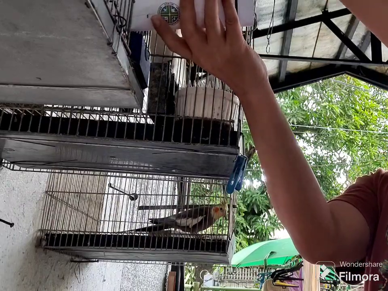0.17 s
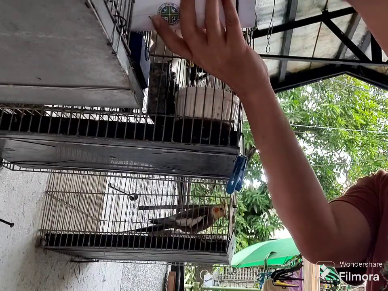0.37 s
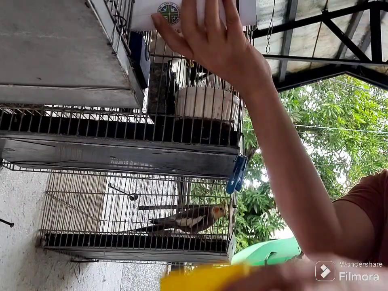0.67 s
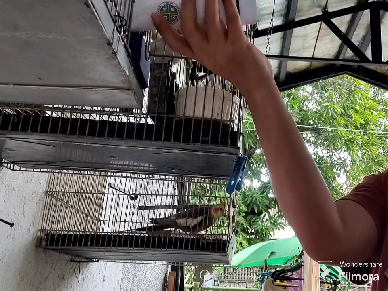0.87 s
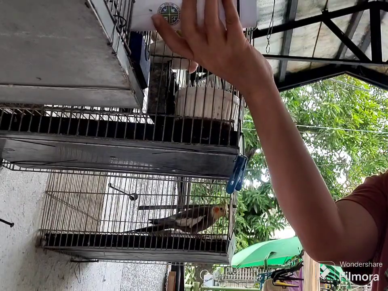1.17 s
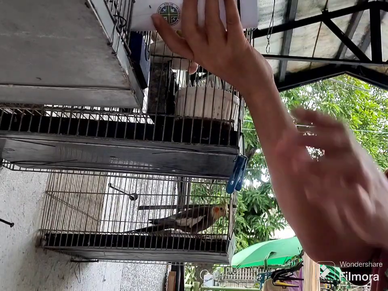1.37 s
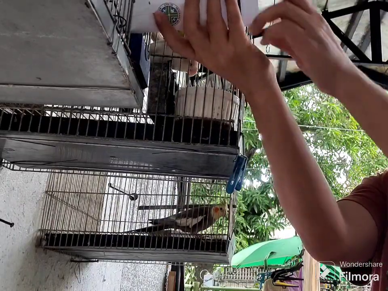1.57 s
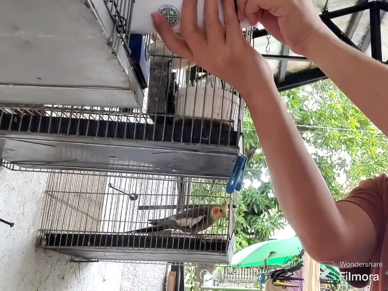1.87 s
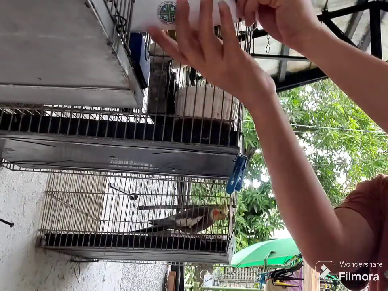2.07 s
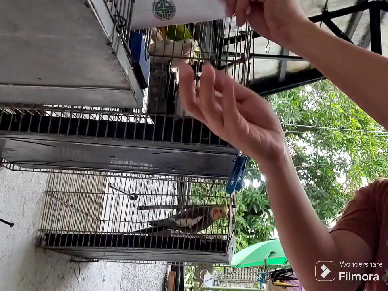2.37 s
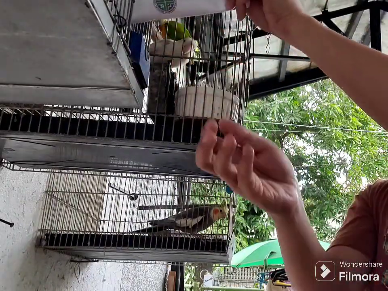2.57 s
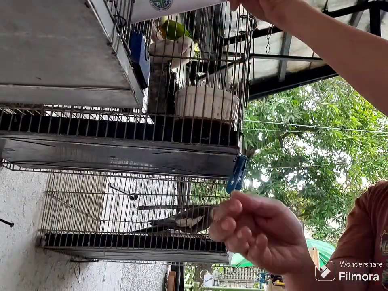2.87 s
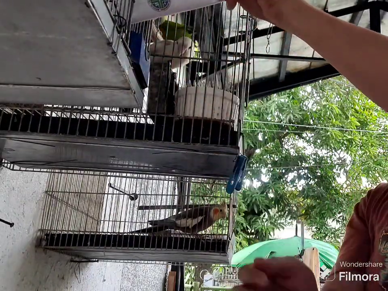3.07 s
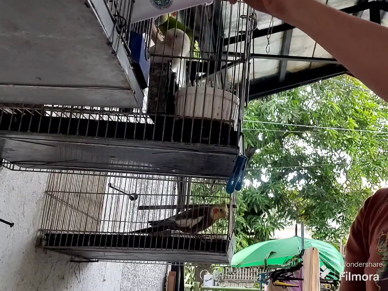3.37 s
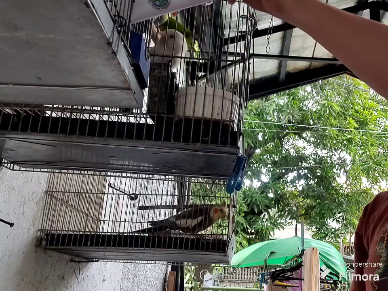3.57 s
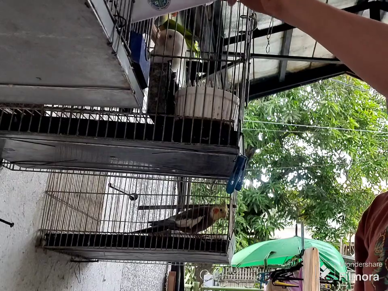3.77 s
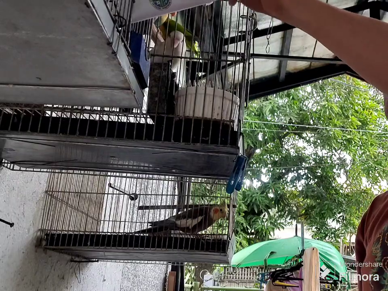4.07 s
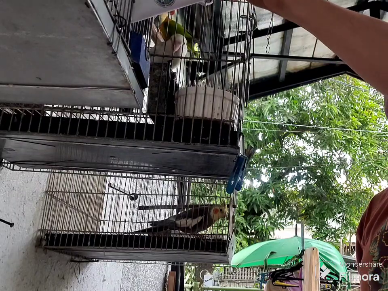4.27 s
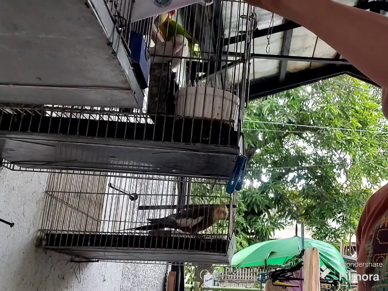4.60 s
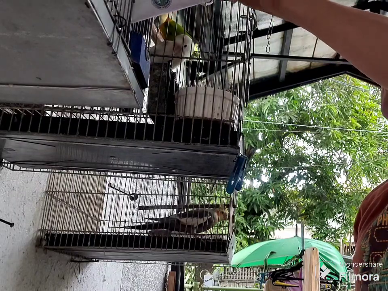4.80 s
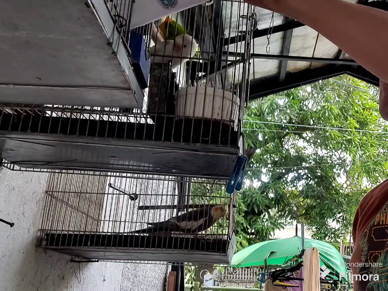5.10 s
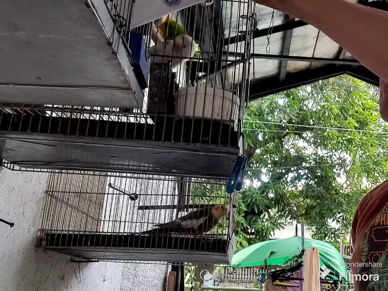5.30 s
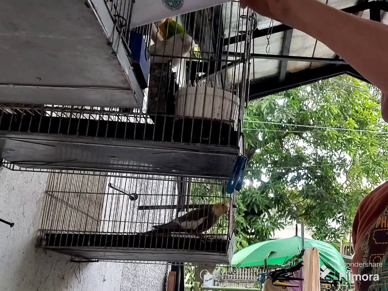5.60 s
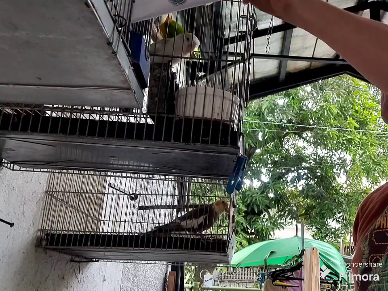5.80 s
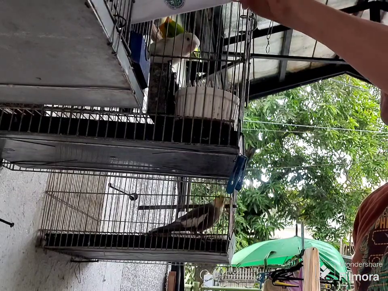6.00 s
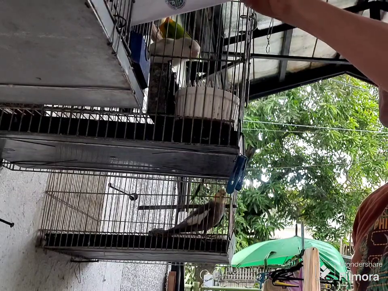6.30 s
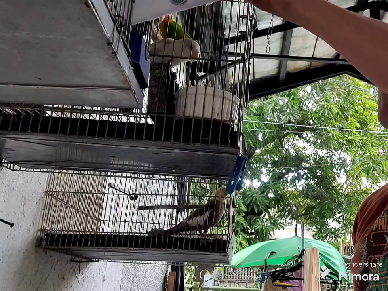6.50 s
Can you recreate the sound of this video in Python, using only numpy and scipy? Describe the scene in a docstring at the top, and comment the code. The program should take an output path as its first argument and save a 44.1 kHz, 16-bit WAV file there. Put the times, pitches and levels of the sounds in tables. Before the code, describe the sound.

A breezy hum with thin squeals cuts off, a tub knocks loudly, then seed is shaken rhythmically down paper into a cage dish, ending with a chirp.

```python
"""A breezy, humming ambience with thin high squeals opens and stops dead; a tub of birdseed lands with a knock.
Under a porch roof, seed is shaken down a paper chute into a bird cage's dish, about seven surges a second, slowing.
Seed is a dense rain of noise grains plus ringing pings; the chute's taps on the wires are coloured noise bursts.
A small parrot chirps once in nine gliding harmonics; behind lie outdoor air and a far drone, from noise and a sine.
The phone's microphone signal is clipped at full scale and loses the top treble."""
import sys
import numpy as np
from scipy import signal
from scipy.fft import rfft, irfft, next_fast_len
from scipy.io import wavfile

SR = 44100
rng = np.random.default_rng(int(sys.argv[2]) if len(sys.argv) > 2 else 0)


def transcribe(signal):
    """Save signal, clipped to [-1, 1], as a 16-bit WAV file at the path in sys.argv[1]."""
    frames = np.atleast_2d(signal).T
    limited = np.clip(frames, -1, 1)
    pcm = np.round(limited * 32767).astype(np.int16)
    wavfile.write(sys.argv[1], SR, pcm)


N = 293265
TIME = np.arange(N) / SR

# The trickle under the shakes, rising and falling. Each row: time in seconds, level in dB.
TRICKLE_LEVEL = [(1.85, -83), (2.0, -67), (2.66, -66), (2.85, -54), (3.3, -56.5), (3.65, -51), (4.47, -53),
                 (4.78, -48.5), (5.08, -53), (5.33, -44.5), (5.68, -54.5), (6.45, -56)]
# Single nudges of the chute before and after the shaking.
# Each row: peak in seconds, level in dB, rise in seconds, hiss relative to the patter in dB.
CHUTE_NUDGES = [(1.28, -65, 0.092, -9), (1.756, -53.5, 0.019, -6), (2.054, -60.5, 0.055, -3),
                (2.405, -58, .036, -7.5), (5.726, -47.5, 0.026, -24), (5.929, -44.5, 0.014, -14.5),
                (5.86, -50, 0.014, -22), (5.995, -50.5, 0.023, -29), (6.216, -49, 0.014, -16),
                (6.365, -43.5, 0.025, -15.5), (6.47, -46.5, 0.038, -25), (6.59, -46, 0.078, -14)]
# Seeds landing. Each row: frequency in Hz, relative dB per Hz.
PATTER_SPECTRUM = [(70, -14), (130, 5.5), (400, -4.5), (800, -2.5), (1400, 1), (2400, 0.5), (3400, 2),
                   (3750, -1), (4500, -2), (5600, -4), (7700, -4), (8500, -20.5), (10500, -24),
                   (15500, -29.5)]
# Resonances of paper and dish. Each row: centre in Hz, width in Hz, boost in dB.
DISH_RESONANCES = [(1460, 74, 3.9), (1713, 37, 11), (2230, 100, 4.6), (2855, 1020, 6.5), (4200, 240, 7.2),
                   (5140, 210, 5.4)]
# Seeds sliding on paper. Each row: frequency in Hz, relative dB per Hz.
SLIDE_SPECTRUM = [(1500, -29), (5000, 3), (8500, 8), (10500, 0.5), (13000, -4), (15500, -3)]
# Small seeds tick brighter than large ones. One list per size, each row: frequency in Hz, weight in dB.
SEED_SIZE_SPECTRA = [
    [(1100, 0), (2200, -20)],
    [(800, -20), (1500, 0), (3200, 0), (5500, -20)],
    [(2200, -20), (4000, 0)],
]
# The width of the band that each seed size fills, in Hz.
SEED_BAND_WIDTHS = [1300, 2300, 18500]
SURGE_FALL_RATIO = 1.92  # every surge takes this many times longer to fall than to rise
FIRST_SHAKE_S = 2.709  # peak of the first surge
HISS_DB, HISS_WANE_DB_PER_S = -6, 4.5  # sliding hiss against patter at the first shake; wanes as paper empties


def seeds(patter_db=1, slide_db=1, trickle_hiss_db=-17, full_flow_db=-45, impacts_per_s=2200):
    """Every shake sends a surge of seed down the paper: more flow means more impacts and more hiss."""
    flow = undb(curve(TRICKLE_LEVEL)) ** 2  # flow and sliding are powers
    waned_db = HISS_WANE_DB_PER_S * np.maximum(TIME - FIRST_SHAKE_S, 0)
    sliding = flow * undb(trickle_hiss_db - waned_db) ** 2
    for peak_s, db, rise_s, hiss_db in [*shakes(), *CHUTE_NUDGES]:
        lag = TIME - peak_s
        side_s = np.where(lag < 0, rise_s, rise_s * SURGE_FALL_RATIO)
        surge = undb(db) ** 2 * np.exp(-np.minimum(2 * (lag / side_s) ** 2, 20))
        flow = flow + surge
        sliding = sliding + surge * undb(hiss_db) ** 2
    rate = impacts_per_s * (0.25 + np.sqrt(flow) / undb(full_flow_db))
    impacts = np.zeros(N)
    for spectrum, width_hz in zip(SEED_SIZE_SPECTRA, SEED_BAND_WIDTHS):
        ticks = colour(grains(rate, spread_db=4.0, ring_s=0.011), spectrum)
        # weighting by bandwidth makes the sizes even together
        impacts += np.sqrt(width_hz) * ticks
    landing = colour(impacts, PATTER_SPECTRUM, DISH_RESONANCES) + undb(-8.5) * pings()
    patter = undb(patter_db) * np.sqrt(flow) * landing
    hiss = colour(grains(2 * rate, spread_db=2, ring_s=0.001), SLIDE_SPECTRUM)
    return patter + undb(slide_db) * np.sqrt(sliding) * hiss


# How hard the hand shakes. Each row: time in seconds, level in dB.
SHAKE_EFFORT = [(2.71, -47.5), (2.84, -56), (3.25, -54.5), (3.38, -45), (3.67, -45.5), (3.81, -40.5),
                (4.1, -45), (4.4, -46), (4.84, -41), (5.3, -44.5), (5.46, -52.5), (5.61, -51.5)]


def shakes(count=21, first_period_s=0.1334, slowing_s=0.00125, rise_s=0.023):
    """The hand's even rhythm slowly tires: each period is longer than the last by slowing_s."""
    periods = first_period_s + slowing_s * np.arange(count)
    times = FIRST_SHAKE_S + np.cumsum(periods) - periods
    rows = []
    for s in times:
        effort_db = np.interp(s, *np.transpose(SHAKE_EFFORT))
        hiss_db = HISS_DB - HISS_WANE_DB_PER_S * (s - FIRST_SHAKE_S)
        rows.append((s, effort_db, rise_s, hiss_db))
    return rows


def pings(count=2400, lo_hz=1200, hi_hz=7500, t60=0.022, spread_db=2.5):
    """Single seeds bounce off the dish and wires, each ringing briefly at its own pitch; rms 1."""
    out, t = np.zeros(N), TIME[:SR // 20]
    decay = fade(t60)[:len(t)]
    for when, pitch, size in rng.random((count, 3)):
        hz = lo_hz * (hi_hz / lo_hz) ** pitch
        boost_db = -spread_db * np.log(max(size, 0.04))
        add(out, when * TIME[-1], undb(boost_db) * decay * np.sin(2 * np.pi * hz * t))
    return unit(out)


def grains(per_second, spread_db, ring_s):
    """Tiny impacts of unequal size, each its own brief noise burst; power evened out across rates, rms 1."""
    chance = np.clip(per_second / SR, 1e-4, 1)
    size = undb(spread_db * np.minimum(rng.exponential(size=N), 4))
    hits = (rng.random(N) < chance) * size ** 2 / chance
    power = signal.lfilter([1], [1, -np.exp(-2 / (ring_s * SR))], hits)
    return unit(np.sqrt(power) * rng.standard_normal(N))


# Taps of paper and fingers on the cage. Each row: start in seconds, relative level in dB, pitch in Hz,
# fall of the spectrum either side of the pitch in dB per octave.
CAGE_TAPS = [(.61, -55.5, 5540, 1), (.686, -62, 12000, 6), (.757, -35, 13000, 6.5), (.762, -43, 5000, 3.5),
             (.783, -49, 12000, 6), (1.39, -66, 13000, 4), (1.507, -54.5, 710, 4.5),
             (1.765, -29.5, 1370, 5.5), (1.787, -32.5, 1400, 6.5), (2.107, -39, 1790, 12),
             (2.977, -43, 1400, 10), (3.228, -45, 1720, 14), (3.6, -43.5, 506, 0), (3.66, -44, 960, 4),
             (3.749, -45, 400, 2), (3.901, -37.5, 3500, 1.5), (3.909, -36.5, 1027, -0.5),
             (3.95, -42.5, 1980, 10), (4.065, -43, 4000, 1.5), (5.3119, -27.5, 890, 0),
             (5.318, -27, 2490, 8), (5.3495, -25.5, 1990, 4), (5.721, -40, 4400, 12), (6.24, -46, 380, 3),
             (6.333, -42.5, 1210, 2.5), (6.604, -37.5, 1670, 4)]
# The colour that all taps share. Each row: frequency in Hz, relative dB per Hz.
TAP_SPECTRUM = [(50, -36), (100, -6), (160, -1), (400, 3), (900, -0.5), (2500, -4.5), (7500, -7),
                (9000, -13), (15500, -21)]
# Hollow resonances of the chute, heard in every tap. Each row: centre in Hz, width in Hz, boost in dB.
CHUTE_RESONANCES = [(556, 140, 5), (990, 410, 2.5), (1540, 320, 1), (2020, 380, 0), (2950, 120, 1.5),
                    (4080, 230, 10.5), (7060, 930, 4.5)]
# Soft bumps of the cage. Each row: start in seconds, pitch in Hz, level in dB, t60 in seconds.
CAGE_BUMPS = [(3.363, 94.5, -42, 0.36), (3.365, 68, -46, .2)]


def taps(burst_db=-1, burst_t60=0.059, attack_s=0.00026, crack=0.51, crack_t60=0.0029,
         ring_db=-0.5, ring_t60=0.042):
    """Short dry knocks and crinkles of the chute against the wires, and dull bumps of the cage."""
    out = np.zeros(N)
    decay = fade(burst_t60) + crack * fade(crack_t60)
    for s, db, hz, slope_db in CAGE_TAPS:
        # the harder the contact, the higher the pitch around which its energy lies
        contact = [(hz * 2.0 ** octave, -slope_db * abs(octave)) for octave in (-8, 0, 8)]
        noise = colour(rng.standard_normal(SR), contact)
        burst = decay * colour(noise, TAP_SPECTRUM, CHUTE_RESONANCES)
        # the struck spot rings briefly at that pitch, less so in the treble
        note_db = ring_db + np.interp(hz, *np.transpose(TAP_SPECTRUM))
        note = ring([(hz, note_db, ring_t60)])
        attack = np.minimum(TIME[:SR] / attack_s, 1)
        add(out, s, undb(db) * (undb(burst_db) * burst + note) * attack)
    for s, hz, db, t60 in CAGE_BUMPS:
        add(out, s, ring([(hz, db, t60)]) * np.minimum(TIME[:SR] / 0.018, 1))
    return porch(out, wet_db=-14.5, t60=0.14, gap_s=0.0057)


# Modes of the tub. Each row: frequency in Hz, relative level in dB, t60 in seconds.
TUB_MODES = [(162.6, -26, 0.29), (257.3, -7, 0.143), (372.4, -11.5, 0.174), (412, -8.5, 0.19),
             (486, -10, 0.25), (528, -13, .1), (569, -3.5, 0.18), (714, -3.5, 0.11), (733, -7.5, 0.101),
             (809, -4, 0.12), (898, 0, 0.08), (1002, 2.5, .08), (1100, -10.5, .1), (1196, -3, .11),
             (1167, -10.5, .1), (1396, -12, .08), (1460, -4, 0.13), (1540, -5, 0.086), (1661, 5.5, 0.041),
             (1790, -5.5, 0.043), (1940, -12, 0.12), (2070, -15.5, 0.12), (2920, -18.5, 0.1)]
# The colour of its clatter. Each row: frequency in Hz, relative dB per Hz.
CLATTER_SPECTRUM = [(70, -34), (180, -8.5), (450, -4), (700, -3), (1500, -5), (2100, -14.5), (3000, -22),
                    (4200, -35.5), (7500, -42), (15000, -49)]
# The knock's diffuse echo under the roof. Each row: frequency in Hz, relative dB per Hz.
ROOF_ECHO_SPECTRUM = [(100, -13.5), (400, 8), (580, 3.5), (800, -10.5), (1200, 1.5), (1550, -5.5),
                      (2100, -17.5), (6000, -25.5), (15000, -44)]
# What rings on faintly after it. Each row: frequency in Hz, level in dB, t60 in seconds.
FAINT_RING_MODES = [(430, -52, 2.7), (560, -56, 2.5), (1170, -54, 2.3)]


def knock(start_s=0.9483, modes_db=-13, clatter_db=-16, clatter_t60=0.17, echo_db=-41, echo_t60=1.0,
          blow_hz=1650):
    """The tub lands: a hard first swing, its hollow modes, a dense clatter and a faint long echo."""
    t = TIME[:SR]
    blow = -1.55 * np.minimum(t / 0.0003, 1) * fade(0.008) * np.sin(2 * np.pi * blow_hz * t)
    clatter = fade(clatter_t60) * colour(rng.standard_normal(SR), CLATTER_SPECTRUM)
    body = undb(modes_db) * ring(TUB_MODES) + undb(clatter_db) * clatter
    diffuse = fade(echo_t60) * colour(rng.standard_normal(SR), ROOF_ECHO_SPECTRUM)
    echo = undb(echo_db) * diffuse + ring(FAINT_RING_MODES)
    # the blow takes a moment to spread through the whole body
    spread = 1 - np.exp(-t / 0.0026)
    out = np.zeros(N)
    add(out, start_s, blow + spread * (body + echo))
    return out


# The chirp's harmonics, first to ninth. Each row: dB at the start, dB that a full voice break would reach.
VOICE_HARMONICS = [(-3, -4), (-12.5, 0.5), (-9.5, -8), (-5.5, -8), (-5.5, -14), (-28, -34), (-24, -22),
                   (-25, -26), (-32, -26)]
CHIRP_S, CHIRP_LENGTH_S, CHIRP_DB = 6.499, 0.053, -14
CHIRP_HZ, CHIRP_SAG_HZ_PER_S = 1844, 4180  # starting pitch and its fall
CHIRP_ATTACK_S, CHIRP_FADE_DB_PER_S, CHIRP_RELEASE_S = 0.022, 522, 0.0056
BREAK_AFTER_S, BREAK_S = 0.022, 0.0092  # delay of the voice break after the start, and its length


def parrot(break_depth=0.89, break_drop_hz=45, jitter=0.026, rasp_db=-12.5):
    """One falling chirp, clear at first and rougher as its second harmonic takes over."""
    age = np.clip(TIME - CHIRP_S, 0, CHIRP_LENGTH_S)
    change = break_depth * ramp(CHIRP_S + BREAK_AFTER_S, BREAK_S)
    hz = CHIRP_HZ - CHIRP_SAG_HZ_PER_S * age - break_drop_hz * change
    release = 1 - ramp(CHIRP_S + CHIRP_LENGTH_S - CHIRP_RELEASE_S, CHIRP_RELEASE_S)
    sounding = ramp(CHIRP_S, CHIRP_ATTACK_S) ** 2 * release
    db = CHIRP_DB - CHIRP_FADE_DB_PER_S * np.maximum(age - CHIRP_ATTACK_S, 0)
    rough_hz = hz * (1 + jitter * (0.158 + change) * walk(1200))
    phase = 2 * np.pi * np.cumsum(rough_hz) / SR
    # each harmonic flutters by itself as the beak moves
    weights = [undb(first + (last - first) * change + 2 * walk(250)) for first, last in VOICE_HARMONICS]
    harmonics = sum(w * np.sin(k * phase + k ** 2) for k, w in enumerate(weights, 1))
    tone = harmonics / np.sqrt(sum(w ** 2 for w in weights) / 2)
    # air rasps through the syrinx once a cycle
    rasp_spectrum = [(800, -21), (3500, 1), (7500, -3.5), (10000, -18), (15500, -8)]  # Hz, dB per Hz
    breath = colour(rng.standard_normal(N), rasp_spectrum)
    rasp = undb(rasp_db) * (0.5 + change) * (1 + np.cos(phase)) * breath
    return porch((tone + rasp) * undb(db) * sounding, wet_db=-8.5, t60=0.13, gap_s=0.0079)


# The opening breeze. Each row: frequency in Hz, relative dB per Hz.
BREEZE_SPECTRUM = [(20, 0), (70, 3), (115, -7.5), (160, -12), (220, -10), (320, -13), (450, -16.5),
                   (1000, -17.5), (2100, -20.5), (3200, -26.5), (6500, -33), (8500, -41), (12500, -40),
                   (15500, -28)]
# Lines of the machine's hum. Each row: frequency in Hz, rms level in dB.
HUM_LINES = [(165, -50), (398, -59), (479, -60), (533, -53.5), (657, -55.5), (1066, -53), (1518, -59.5)]
# Two thin squeals. Each row: start in seconds, pitch in Hz, relative level in dB, fade time constant in seconds.
THIN_SQUEALS = [(0.025, 5670, -42, 0.13), (0.201, 3950, -43.5, 0.053)]
# Resonances in both squeals, gliding with them. Each row: centre in Hz, width in Hz, relative level in dB.
SQUEAL_RESONANCES = [(4560, 220, -4.5), (6380, 290, -1.5), (8640, 930, -12.5)]
# The sizzle that goes with each squeal. Each row: frequency in Hz, relative dB per Hz.
SIZZLE_SPECTRUM = [(3000, -6.5), (5500, -3), (7300, -5.5), (8800, -9), (9800, -10), (11400, -6),
                   (12800, -4), (15500, 4)]
BREEZE_END_S = 0.517
SQUEAL_ATTACK_S, SQUEAL_HOLD_S = 0.021, 0.022
SQUEAL_SHARP, SQUEAL_SETTLE_S = 0.09, 0.03  # starts sharp by this share; time constant of settling
WHISTLE_S, WHISTLE_HZ, WHISTLE_WIDTH_HZ, WHISTLE_DB = 0.33, 2150, 260, -54  # faint and airy


def opening(breeze_db=-38, pitch_width_hz=320, pitch_db=0.5, octave_db=-11, sizzle_db=7.0):
    """Wind rumble, a machine's hum, thin squeals and an airy whistle, all stopping at once."""
    out = undb(breeze_db + walk(6.5)) * colour(rng.standard_normal(N), BREEZE_SPECTRUM)
    for hz, db in HUM_LINES:
        phase = 2 * np.pi * np.cumsum(hz + 1.45 * walk(17.0)) / SR
        out += np.sqrt(2) * undb(db) * np.sin(phase)
    for s, pitch_hz, level_db, fade_s in THIN_SQUEALS:
        fading = np.exp(-np.maximum(TIME - s - SQUEAL_ATTACK_S - SQUEAL_HOLD_S, 0) / fade_s)
        shape = ramp(s, SQUEAL_ATTACK_S) * fading
        pitch = (pitch_hz, pitch_width_hz, pitch_db)
        octave = (2 * pitch_hz, 2 * pitch_width_hz, octave_db)
        glide = 1 + SQUEAL_SHARP * np.exp(-np.maximum(TIME - s, 0) / SQUEAL_SETTLE_S)
        partials = [pitch, octave, *SQUEAL_RESONANCES]
        squeal = sum(undb(db) * band_noise(hz * glide, width) for hz, width, db in partials)
        sizzle = undb(sizzle_db) * colour(rng.standard_normal(N), SIZZLE_SPECTRUM)
        out += undb(level_db) * shape * (squeal + sizzle)
    whistle = ramp(WHISTLE_S, SQUEAL_ATTACK_S) * band_noise(WHISTLE_HZ, WHISTLE_WIDTH_HZ)
    out += undb(WHISTLE_DB) * whistle
    return out * (TIME < BREEZE_END_S)


# Still outdoor air. Each row: frequency in Hz, relative dB per Hz.
AIR_SPECTRUM = [(18, -54), (30, -44), (81, -5), (332, -5), (622, -9.5), (996, -10.5), (1110, -10.5),
                (1870, -18), (2130, -20.5), (5740, -30), (6540, -33), (15500, -40.5)]
# How the air swells. Each row: time in seconds, level in dB.
AIR_SWELL = [(.9, -57.5), (2.5, -58.5), (3.5, -54.5), (5, -57.5), (6.65, -53.5)]
DRONE_S, DRONE_SPREAD_S, DRONE_HZ, DRONE_DB = 6.22, 0.36, 363, -60.5  # loudest moment, half its length


def air():
    """Quiet outdoor air that swells a little, and a faint far drone that wavers in pitch and level."""
    swell = np.exp(-((TIME - DRONE_S) / DRONE_SPREAD_S) ** 2)
    level = np.sqrt(2) * swell * undb(DRONE_DB + 2 * walk(25))
    drone = level * np.sin(2 * np.pi * np.cumsum(DRONE_HZ + 7 * walk(40)) / SR)
    air_db = curve(AIR_SWELL) + 0.4 * walk(6.1)
    return drone + undb(air_db) * colour(rng.standard_normal(N), AIR_SPECTRUM)


# Echoes from wall, roof and cage. Each row: frequency in Hz, relative level in dB.
ECHO_SPECTRUM = [(100, -2), (1700, -5.5), (3500, -6.5), (5200, 1), (7000, 3.5), (8300, -7.5), (15000, -6.5)]


def porch(x, wet_db, t60, gap_s):
    """The direct sound, then after a gap the scattered, decaying echoes of nearby surfaces."""
    tail = colour(rng.standard_normal(SR), ECHO_SPECTRUM) * fade(t60) * (TIME[:SR] > gap_s)
    return x + undb(wet_db) * signal.fftconvolve(x, tail / np.linalg.norm(tail))[:N]


def undb(db):
    """Decibels to an amplitude factor."""
    return 10 ** (np.asarray(db) / 20)


def curve(rows):
    """A level over time, its points joined by straight lines."""
    return np.interp(TIME, *np.transpose(rows))


def ramp(start_s, length_s):
    """A straight rise from 0 to 1."""
    return np.clip((TIME - start_s) / length_s, 0, 1)


def walk(rate):
    """Slow chance with a spread near 1: random points, rate per second, joined by straight lines."""
    knots = rng.standard_normal(int(N / SR * rate) + 2)
    return np.interp(TIME * rate, np.arange(len(knots)), knots)


def unit(x):
    """Scale to rms 1."""
    return x / np.sqrt(np.mean(x ** 2))


def colour(x, points, peaks=()):
    """Filter by a spectrum with resonant bumps on it; rms 1."""
    size = next_fast_len(len(x))
    f = np.maximum(np.fft.rfftfreq(size, 1 / SR), 1)
    hz, db = np.transpose(points)
    gain_db = np.interp(np.log(f), np.log(hz), db)
    for centre, width, boost in peaks:
        gain_db = gain_db + boost / (1 + (2 * (f - centre) / width) ** 2)
    return unit(irfft(rfft(x, size) * undb(gain_db), size)[:len(x)])


def band_noise(hz, width_hz):
    """Noise in a narrow band around a pitch that may move; rms 1."""
    lowpass = signal.butter(2, width_hz / 2, fs=SR, output="sos")
    re, im = signal.sosfilt(lowpass, rng.standard_normal((2, N)))
    phase = 2 * np.pi * np.cumsum(hz * np.ones(N)) / SR
    return unit(re * np.cos(phase) + im * np.sin(phase))


def fade(t60):
    """One second of exponential decay, down 60 dB after t60 seconds."""
    return np.exp(-np.log(1000) * TIME[:SR] / t60)


def ring(modes):
    """One second of struck modes (Hz, dB, t60 in seconds), each starting at its own random phase."""
    out = np.zeros(SR)
    for hz, db, t60 in modes:
        out += undb(db) * fade(t60) * np.sin(2 * np.pi * (hz * TIME[:SR] + rng.random()))
    return out


def add(track, s, sound):
    """Mix a sound into a track at a time in seconds."""
    start = int(s * SR)
    track[start:start + len(sound)] += sound[:N - start]


def scene():
    """Everything that reaches the one microphone."""
    return (opening() + air() + knock() + seeds() + taps() + parrot())[None]


def record(dry, top_hz=15700):
    """The phone clips at full scale and cuts the top."""
    lowpass = signal.ellip(10, 0.2, 80, top_hz, fs=SR, output="sos")
    return signal.sosfilt(lowpass, np.clip(dry, -1, 1))


dry = scene()
out = record(dry)
transcribe(out)
```